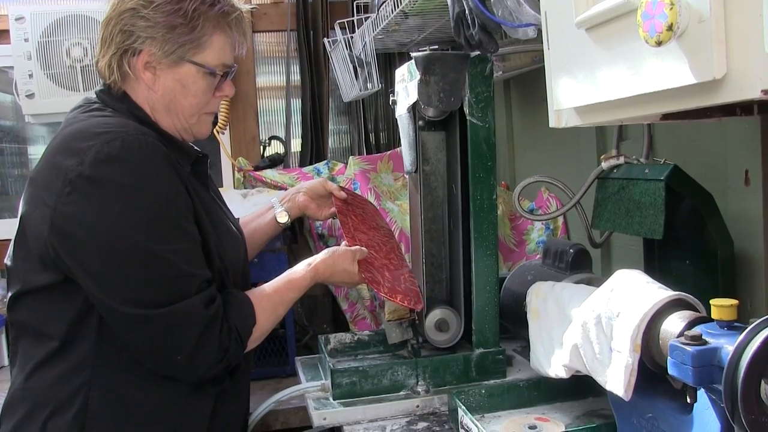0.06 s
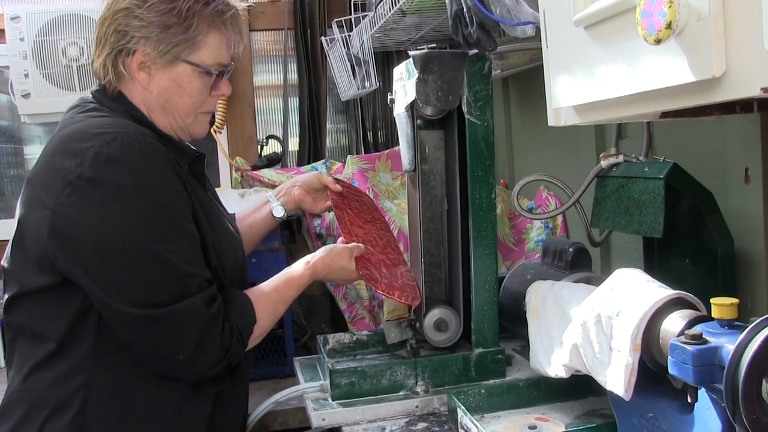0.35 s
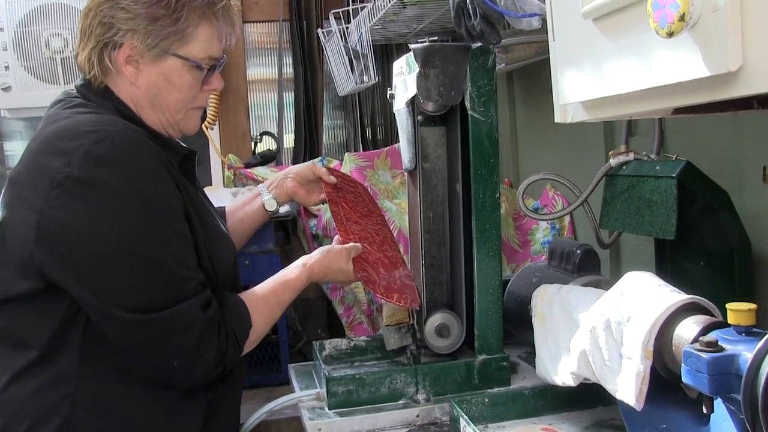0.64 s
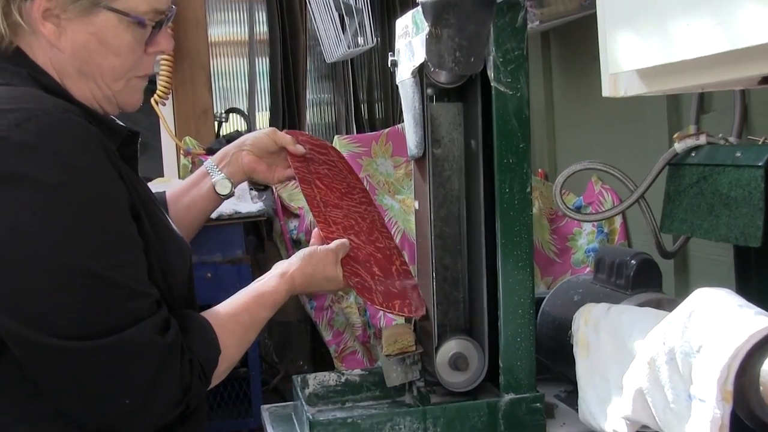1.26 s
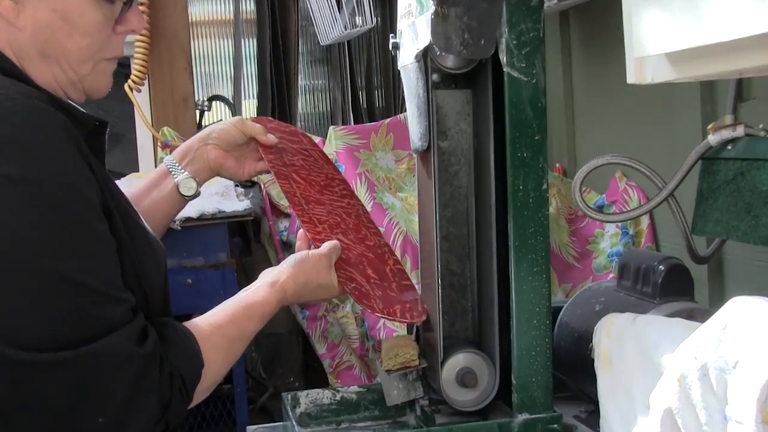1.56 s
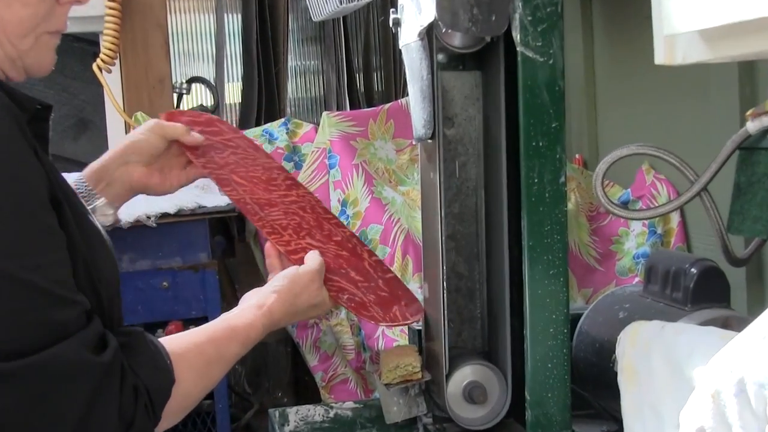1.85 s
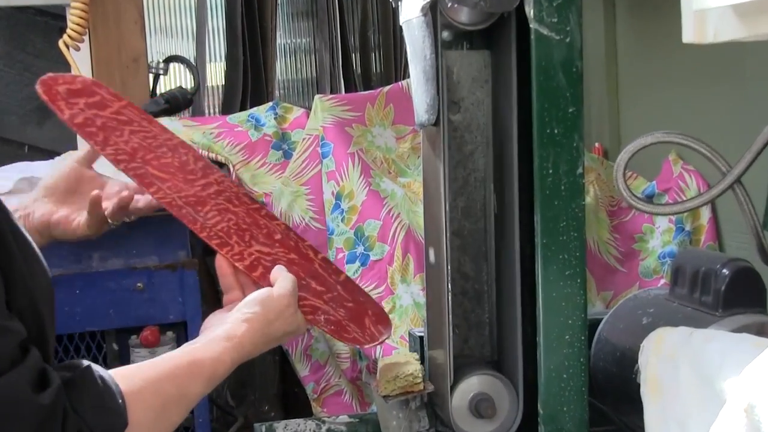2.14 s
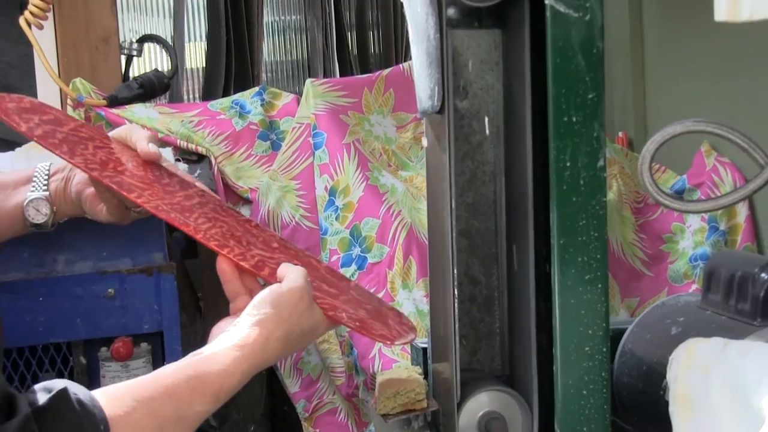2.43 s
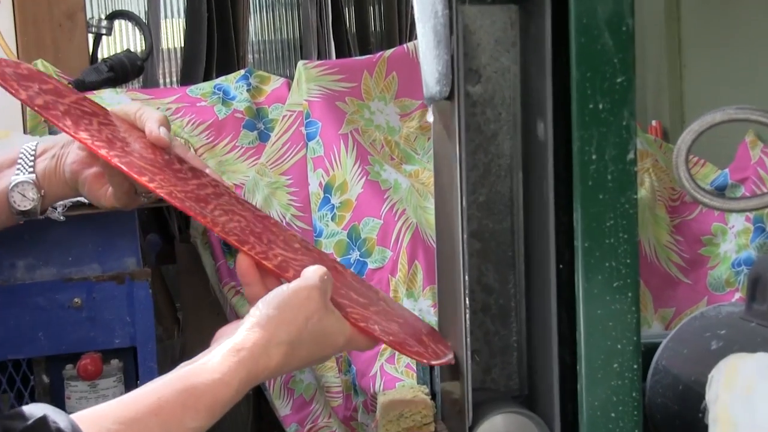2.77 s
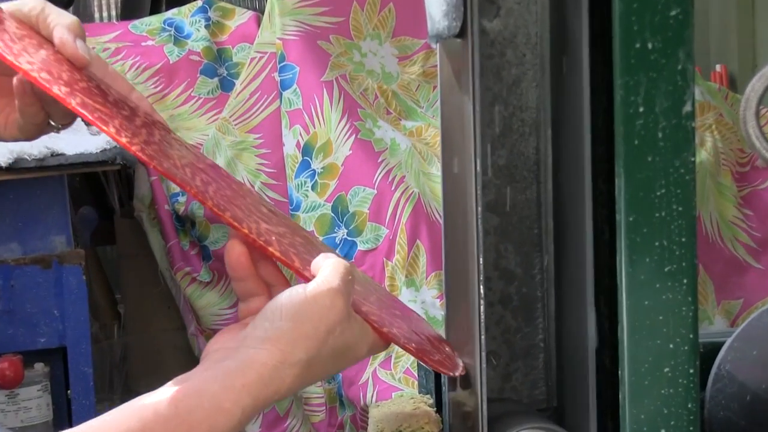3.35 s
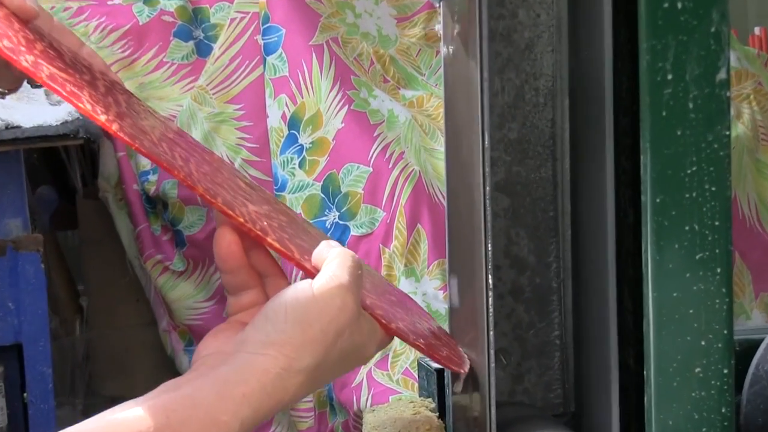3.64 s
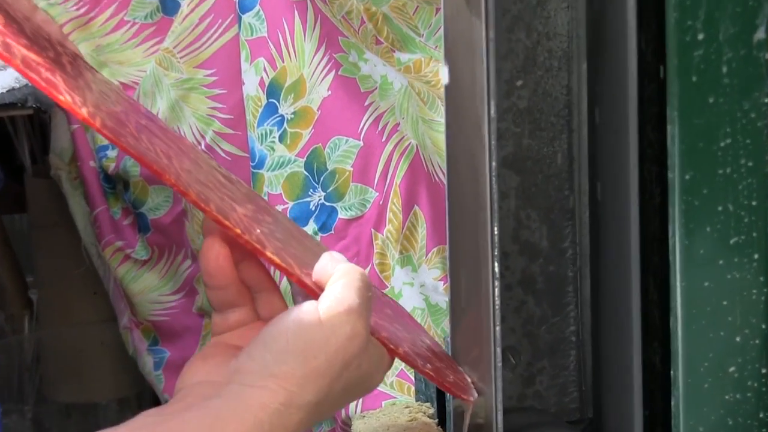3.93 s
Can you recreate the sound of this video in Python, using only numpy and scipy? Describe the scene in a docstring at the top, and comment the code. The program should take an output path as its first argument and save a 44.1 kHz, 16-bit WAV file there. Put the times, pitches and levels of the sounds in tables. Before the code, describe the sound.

Gritty grinding of glass on a sanding belt rings and squeals in a small room. Midway it stops, and only the quieter hum, whine and rush of the machine remain until the glass is pressed back on.

```python
"""A long glass plate is ground against a running belt sander in a small workshop.
From the start, grit rasps along its edge and sets it ringing, with short squeals, over motor and belt.
As the contact slides along the edge, other modes speak. At 2 s the plate lifts, leaving the motor's hum
and whine and the rush of the belt. Just before 3 s it is pressed on again and grinds to the end."""
import sys
import numpy as np
from scipy import signal
from scipy.fft import rfft, irfft
from scipy.io import wavfile

SR = 44100
rng = np.random.default_rng(int(sys.argv[2]) if len(sys.argv) > 2 else 0)


def wav_record(signal):
    """Record a signal, one row per channel, as 16-bit PCM in the file named by sys.argv[1]."""
    frames = np.transpose(np.atleast_2d(signal))
    bounded = np.clip(frames, -1, 1)
    # unit amplitude maps onto the largest positive 16-bit level
    quanta = np.round(bounded * 32767).astype(np.int16)
    wavfile.write(sys.argv[1], SR, quanta)


N = 176400
TIME, FREQS = np.arange(N) / SR, np.fft.rfftfreq(N, 1 / SR)

# Levels in the tables are ahead of the mix trims.
# Grinding strength through each pass: time_s, mid_db, low_db, treble_db
FIRST_PASS = [(0.0, -23, -30.5, -35.5), (0.082, -30, -34.5, -32.5), (0.138, -29, -36.5, -34),
              (0.31, -30, -33.5, -36.5), (0.476, -31.5, -34, -30.5), (0.68, -28.5, -33, -33.5),
              (0.87, -29, -33, -34.5), (0.924, -28.5, -33, -37.5), (1.014, -28, -36, -31),
              (1.102, -28.5, -34, -35.5), (1.402, -29, -36.5, -33.5), (1.462, -28.5, -35, -36),
              (1.506, -27.5, -34.5, -33), (1.79, -34.5, -33, -40.5), (1.828, -32.5, -41.5, -38),
              (1.894, -31.5, -39.5, -37.5), (1.934, -36, -49, -38), (1.99, -66, -60, -60)]
SECOND_PASS = [(2.885, -79, -66, -88), (2.893, -37.5, -53, -47), (2.911, -32, -53, -34.5),
               (2.987, -35, -48, -36.5), (3.009, -32.5, -57, -37.5), (3.033, -32.5, -34.5, -36.5),
               (3.145, -33, -41, -37), (3.169, -33.5, -34.5, -38), (3.271, -31, -34, -37),
               (3.461, -28.5, -31, -34.5), (3.471, -29, -39, -31.5), (3.495, -28, -34, -35.5),
               (3.561, -31.5, -32.5, -39), (3.715, -37, -35, -42), (3.783, -29, -33.5, -36.5),
               (3.861, -34.5, -36.5, -37.5), (4.0, -33, -34, -39.5)]
# Tone colour of the rasp: frequency_hz, level_db
RASP_EQ = [(300, -54), (700, -17.5), (1100, -10), (1700, -5.5), (2300, -3), (3000, 1.5), (4000, -1),
           (4700, -0.5), (5700, -6), (6600, -10), (7200, -6.5), (8300, -10), (11000, -11.5), (13000, -16),
           (15800, -21)]
# Modes of the plate: pitch_hz, width_hz, level_db, sweet_spot (0-1 along the edge), loss_elsewhere_db
GLASS_MODES = [(760, 28, -15.5, 0.96, 15), (958, 27, -17, 0.62, 4.5), (1143, 29, -17, 0.3, 3),
               (1208.3, 41, -9, 0.09, 5.5), (1315, 35, -15.5, 0.6, 3.5), (1458.7, 17.5, -7, 0.12, 1.5),
               (1501, 23, -13, 0.47, 4), (1610, 23, -8.5, 0.87, 28), (1727, 41, -14, .85, 9),
               (1875, 42, -15.5, 0.4, 6), (2005.5, 15, -2, 0.65, 9.5), (2156, 22, -4.5, 1, 7),
               (2333, 36, -10, 0, 6.5), (2396, 28, -9.5, 1, 2), (2617, 50, -15.5, 0.14, 3.5),
               (2726, 25, -12, 0.9, 4), (2795, 28, -15, 0.15, 7.5), (3005, 23, -7.5, 0.12, 7.5),
               (3190, 27, -8.5, .13, 9), (3320, 19, -7, 0.69, 7), (3594, 28, -7.5, 0.22, 7),
               (3730, 71, -10, 0.24, 25), (3783, 55, -10.5, .48, -3), (4028, 39, -5.5, 1, 10),
               (4085, 70, -12, 0.6, 6.5), (4540, 44, -12, 0.56, 5.5), (4655, 32, -12, 0.27, 2.5),
               (4810, 17, -14.5, 0.68, 8), (5026, 16, -17, 0.24, 7), (5230, 50, -19, 0.07, 6),
               (5515, 30, -11, .95, 1), (5720, 45, -16, .7, 6), (6060, 22, -10.5, .02, 14),
               (6490, 50, -8, 0.22, 4), (6666, 52, -4, .74, 8.5), (7580, 29, -14, 0.4, 3),
               (7860, 130, -10.5, .99, 2.5), (8490, 60, -14, 0.35, 3), (8640, 30, -14, 0.92, 14),
               (11050, 45, -15.5, 0.74, 10), (11370, 70, -18, .25, 6), (12800, 70, -19, 0.75, 9)]
# Squeals of the glass: start_s, length_s, pitch_hz, level_db
SQUEALS = [(0.0, 0.18, 3737, -34.5), (0.0, 0.27, 3065, -34.5), (0.0, 0.28, 4690, -39),
           (0.218, 0.27, 3135, -34), (0.535, 0.1, 3017, -34.5), (0.57, .1, 3866, -34),
           (0.741, 0.15, 3760, -35.5), (0.955, .1, 5007, -36), (1.307, .1, 6400, -37.5),
           (1.35, 0.17, 3801, -39), (1.48, .2, 4560, -41), (1.828, .11, 3350, -38),
           (2.893, 0.14, 4810, -43), (2.996, .1, 3347, -33.5), (3.006, .05, 6630, -37),
           (3.113, 0.15, 2008, -37), (3.337, 0.079, 6730, -36.5), (3.414, .14, 3368, -31.5),
           (3.44, 0.044, 6670, -33.5), (3.54, 0.068, 2165, -29), (3.738, .12, 4038, -42),
           (3.86, .14, 2730, -36.5)]
# Room decay: frequency_hz, t60_s
ROOM_DECAY = [(300, 0.39), (3000, 0.16), (14000, 0.095)]
# Tone colour of the echo: frequency_hz, level_db
ROOM_EQ = [(500, -8.5), (3000, -8), (8000, -7), (13000, -12.5)]
# Steady tones of motor and pulleys: pitch_hz, level_db
HUM_TONES = [(59, -88), (262, -69), (360.5, -62), (592, -65), (759, -69.5), (1044, -59.5), (1131, -61),
             (1432, -71), (1669, -73), (2697, -72)]
# Swells of the motor's whine: time_s, level_db
WHINE_LEVEL = [(0, -59), (1.8, -59), (2.05, -53.5), (2.3, -63), (2.5, -63), (2.75, -53.5), (3.0, -53),
               (4, -52)]
# Tone colour of the belt's rush: frequency_hz, level_db
RUSH_EQ = [(20, -29), (45, -31), (70, -22), (105, -22), (150, -13), (195, -3.5), (270, -3), (320, -5),
           (370, -3.5), (480, -0.5), (600, 4.5), (670, 0), (750, 4), (850, -3), (1000, -1.5), (1300, -3),
           (1520, -6.5), (2200, -11), (2750, -10), (4000, -16.5), (5200, -20), (6200, -25.5), (8500, -27.5),
           (12000, -32.5), (15800, -41)]
# Stereo likeness of the rush: frequency_hz, correlation (0-1)
RUSH_LIKENESS = [(60, 0.68), (130, 1), (290, 0.69), (640, 0.75), (1410, 0.55), (3100, 0.8), (6820, 0.71),
                 (15000, 0.96)]
# Stereo lean of the rush: frequency_hz, left_minus_right_db
RUSH_BALANCE = [(60, -2), (150, 0.5), (380, -4.5), (950, 1), (2380, -1.5), (5980, 0.0), (15000, -1)]
# Resonances of the machine under load: pitch_hz, width_hz, level_db
DRONE_MODES = [(203, 14.5, -64), (236.5, 21, -66.5), (383.5, 7.2, -59.5), (415, 11, -61)]

TOUCH_S, LIFT_S = .003, .03
LOW_EDGE_HZ, HIGH_EDGE_HZ, CROSSOVER_ORDER = 2450, 5800, 8.1  # where low, mid and treble meet
GRAINS_PER_S, GRAIN_SPREAD_DB = 22000, 2.5
BITES_PER_S, BITE_SIZE, BITE_S = 220, .29, .0017  # coarse grains bite and chips crumble away
CHATTER_DB, CHATTER_HZ = 0.47, 218  # the edge skips on the belt
LAP_DB, LAP_HZ = 0.34, 11.7  # the belt is uneven along its length
THICKET_T60_S, THICKET_SHARE = 0.086, 0.27
RASP_TRIMS_DB = (-8, -6, -3)  # low, mid, treble
GLASS_TRIM_DB, SWEET_SPOT_REACH = -0.22, 0.2
DRIVE_SPREAD = 0.063  # a mode takes up energy within about this share of its pitch
SQUEAL_TRIM_DB, SQUEAL_JITTER_HZ, FLUTTER_DB, FLUTTER_RATE_HZ = -1.5, 18.1, 2, 60
ROOM_CENTRE_SHARE, PAN_DB = 0.21, -.3  # pan is left minus right
WHINE_HZ, WAVER_DB, WAVER_DEPTH_HZ = 1263, 0.8, 0.77
RUSH_DB, LOAD_BOOST_DB, DRONE_SECOND_PASS_DB = -48.5, 0.36, -4
CUTOFF_HZ = 15900


def amp(db):
    """Decibels to gain."""
    return 10 ** (np.asarray(db) / 20)


def unit(x):
    """Scales to rms 1."""
    return x / np.sqrt(np.mean(x ** 2) + 1e-20)


def at_hz(points, hz):
    """Reads a table on a log-frequency axis."""
    f, value = np.transpose(points)
    return np.interp(np.log(hz + 1), np.log(f + 1), value)


def eq(x, gain):
    """Filters by a gain for each frequency."""
    return irfft(rfft(x) * gain, N)


def drift(rate_hz):
    """Random movement up to a rate, rms 1."""
    return unit(eq(rng.standard_normal(N), 1 / (1 + (FREQS / rate_hz) ** 4)))


def ring(x, hz, width_hz):
    """One decaying mode: the narrower, the longer it rings."""
    r = np.exp(-np.pi * width_hz / SR)
    return signal.lfilter([1, 0, -1], [1, -2 * r * np.cos(2 * np.pi * hz / SR), r * r], x)


def contact():
    """Envelopes of the two passes: glass on belt (0-1), and the low, mid and treble gains."""
    touch, gains = np.zeros(N), np.zeros((3, N))
    for rows in (FIRST_PASS, SECOND_PASS):
        times, mid, low, treble = np.transpose(rows)
        attack = np.clip((TIME - times[0]) / TOUCH_S + 1, 0, 1)
        release = np.clip((times[-1] - TIME) / LIFT_S + 1, 0, 1)
        gate = attack * release
        touch += gate
        gains += gate * amp([np.interp(TIME, times, db) for db in (low, mid, treble)])
    return touch, gains


def grit():
    """Dense tiny impacts of abrasive grains, clumped by sudden bites, chatter and each lap of the belt."""
    size = amp(GRAIN_SPREAD_DB * np.minimum(rng.exponential(1, N), 5)) * rng.choice([-1, 1], N)
    bites = (rng.random(N) < BITES_PER_S / SR) * np.minimum(rng.exponential(1, N), 3)
    crumble = 1 + BITE_SIZE * signal.lfilter([1], [1, -np.exp(-1 / (BITE_S * SR))], bites)
    tremble = amp(CHATTER_DB * drift(CHATTER_HZ) + LAP_DB * np.sin(2 * np.pi * LAP_HZ * TIME))
    hits = rng.random(N) < GRAINS_PER_S / SR
    return unit(hits * size * crumble * tremble)


def rasp(grains, gains, place, zones=4):
    """Grain impacts heard directly and through a thicket of weak modes that changes along the edge."""
    t = np.arange(SR // 5) / SR
    thicket = np.zeros(N)
    for zone in range(zones):
        response = rng.standard_normal(len(t)) * amp(-60 * t / THICKET_T60_S)
        crossfade = np.cos(np.pi / 2 * np.clip(place * (zones - 1) - zone, -1, 1))
        thicket += crossfade * unit(signal.fftconvolve(grains, response)[:N])
    scrape = np.sqrt(1 - THICKET_SHARE) * grains + np.sqrt(THICKET_SHARE) * thicket
    low, low_mid = (1 / (1 + (FREQS / hz) ** (2 * CROSSOVER_ORDER)) for hz in (LOW_EDGE_HZ, HIGH_EDGE_HZ))
    colour = amp(at_hz(RASP_EQ, FREQS))
    bands = zip(gains, (low, low_mid - low, 1 - low_mid), RASP_TRIMS_DB)
    return sum(gain * amp(db) * unit(eq(scrape, colour * band)) for gain, band, db in bands)


def glass_ring(grains, gains, place):
    """Grit rings the plate's strong modes; each comes and goes as the contact slides past its spot."""
    out = np.zeros(N)
    for hz, width, db, sweet_spot, loss_db in GLASS_MODES:
        band_gain = gains[int(hz > LOW_EDGE_HZ) + int(hz > HIGH_EDGE_HZ)]
        away = 1 - np.exp(-((place - sweet_spot) / SWEET_SPOT_REACH) ** 2)
        uptake = 1 / (1 + ((FREQS - hz) / (DRIVE_SPREAD * hz)) ** 2)
        drive = eq(grains * rng.choice([-1, 1], N), uptake)
        drive /= np.std(ring(drive, hz, width))
        out += ring(drive * band_gain * amp(db - loss_db * away), hz, width)
    return amp(GLASS_TRIM_DB) * out


def squeals():
    """The belt catches one mode and makes it sing: a short, fluttering tone swells out of the rasp."""
    out = np.zeros(N)
    for start, length, hz, db in SQUEALS:
        swell = np.sin(np.pi * np.clip((TIME - start) / length, 0, 1)) ** 2
        cycles = np.cumsum(hz + SQUEAL_JITTER_HZ * drift(FLUTTER_RATE_HZ)) / SR
        level = amp(db + FLUTTER_DB * drift(FLUTTER_RATE_HZ))
        out += swell ** 0.28 * level * np.sin(2 * np.pi * cycles)
    return np.sqrt(2) * amp(SQUEAL_TRIM_DB) * out


def workshop_echo(x):
    """Short diffuse echo of a crowded room, arriving mostly from the sides."""
    hz, t, noise = signal.stft(rng.standard_normal((2, SR // 3)), SR, nperseg=256)
    decay = amp(-60 * t / at_hz(ROOM_DECAY, hz)[:, None])
    tail = signal.istft(noise * decay, SR, nperseg=256)[1]
    tail = np.pad(tail, ((0, 0), (SR // 300, 0)))  # pre-delay
    tail /= np.linalg.norm(tail, axis=1, keepdims=True)
    centre, side = signal.fftconvolve(x[None], tail, axes=1)[:, :N]
    wet = np.sqrt(ROOM_CENTRE_SHARE) * centre + np.sqrt(1 - ROOM_CENTRE_SHARE) * np.array([side, -side])
    return eq(wet, amp(at_hz(ROOM_EQ, FREQS)))


def motor():
    """Motor and pulleys hum in slightly wavering tones, with a whine that swells and dips."""
    def tone(hz, db):
        cycles = np.cumsum(hz + WAVER_DEPTH_HZ * drift(rate_hz=7.2)) / SR + rng.random()
        return np.sqrt(2) * amp(db + WAVER_DB * drift(rate_hz=3.2)) * np.sin(2 * np.pi * cycles)
    hum = sum(tone(hz, db) for hz, db in HUM_TONES)
    return hum + tone(WHINE_HZ, np.interp(TIME, *np.transpose(WHINE_LEVEL)))


def belt_rush(touch):
    """The running belt's rush, spread by the room and a shade louder under load."""
    left, spread = rng.standard_normal((2, N))
    likeness = at_hz(RUSH_LIKENESS, FREQS)
    right = eq(left, likeness) + eq(spread, np.sqrt(1 - likeness ** 2))
    lean_db = at_hz(RUSH_BALANCE, FREQS) / 2
    colour = amp(at_hz(RUSH_EQ, FREQS) + np.array([lean_db, -lean_db]))
    rush = unit(eq(np.array([left, right]), colour))
    return rush * amp(RUSH_DB + LOAD_BOOST_DB * touch + .5 * drift(rate_hz=30))


def load_drone(touch):
    """Low resonances of the machine, shaken while the glass presses on, harder in the first pass."""
    shake = touch * amp(np.where(TIME > SECOND_PASS[0][0], DRONE_SECOND_PASS_DB, 0))
    modes = (amp(db) * unit(ring(rng.standard_normal(N), hz, width)) for hz, width, db in DRONE_MODES)
    return shake * sum(modes)


def scene():
    """Grinding and its echo over the bed of the running machine."""
    touch, gains = contact()
    place = np.cumsum(touch) / touch.sum()  # 0-1 along the edge, moving only while it touches
    grains = grit()
    grinding = rasp(grains, gains, place) + glass_ring(grains, gains, place) + squeals()
    machine = motor() + belt_rush(touch) + load_drone(touch)
    pan = amp([[PAN_DB / 2], [-PAN_DB / 2]])
    return (grinding + workshop_echo(grinding)) * pan + machine


def record(dry):
    """A steep low-pass takes off the very top."""
    lowpass = signal.firwin(601, CUTOFF_HZ, window=("kaiser", 9), fs=SR)
    return signal.oaconvolve(dry, lowpass[None], "same")


dry = scene()
out = record(dry)
wav_record(out)
```